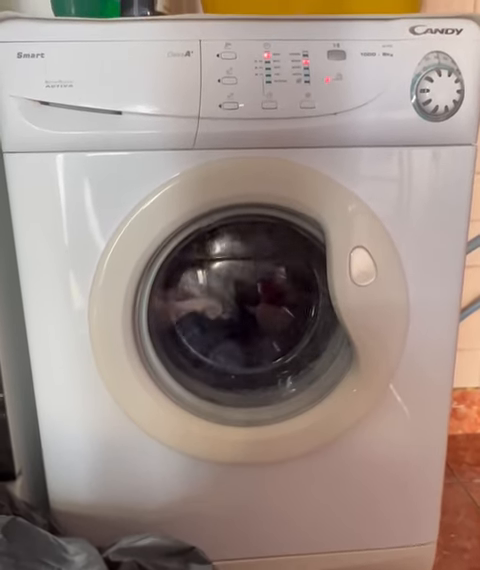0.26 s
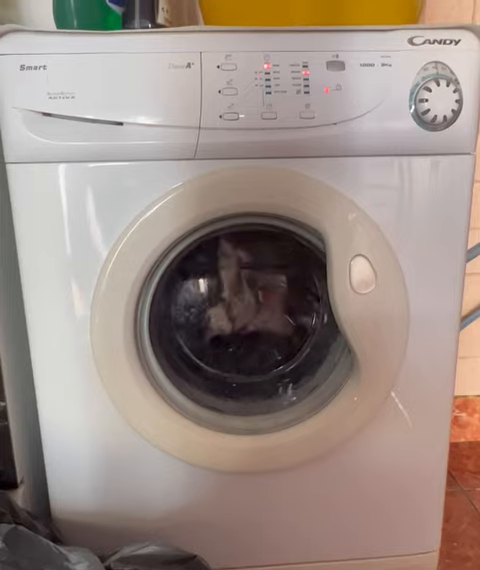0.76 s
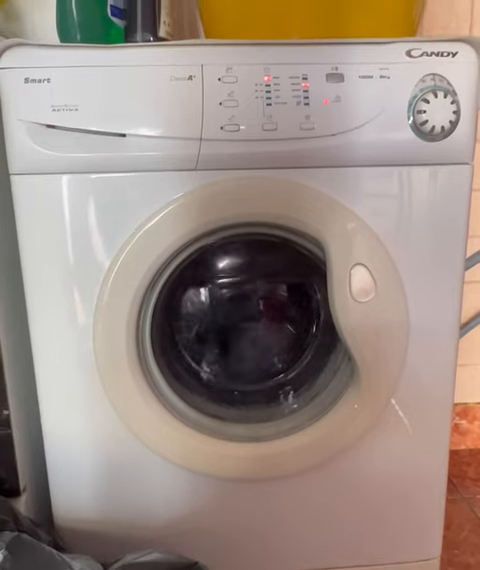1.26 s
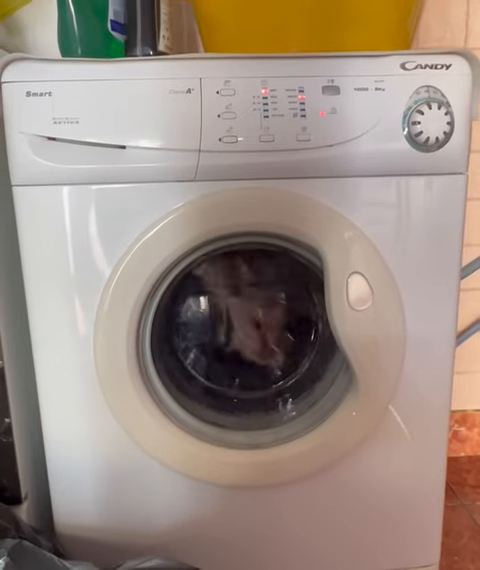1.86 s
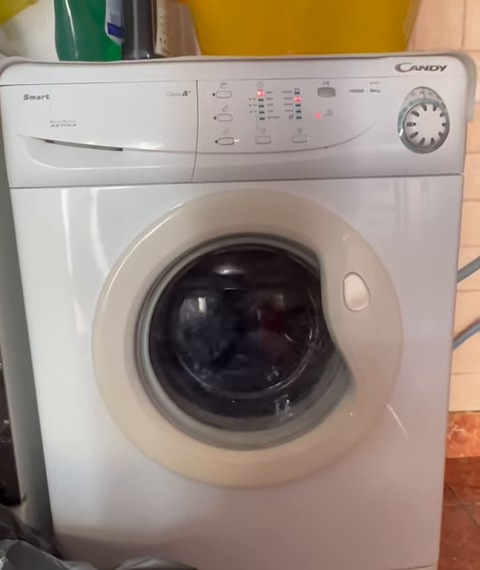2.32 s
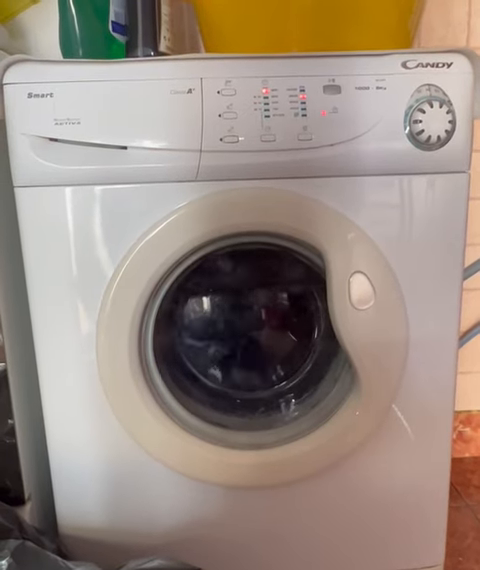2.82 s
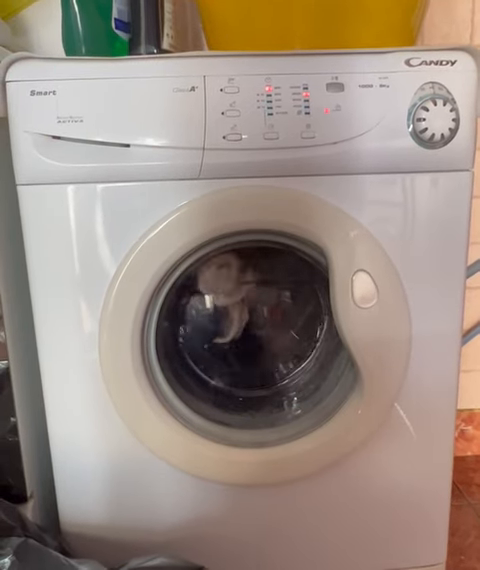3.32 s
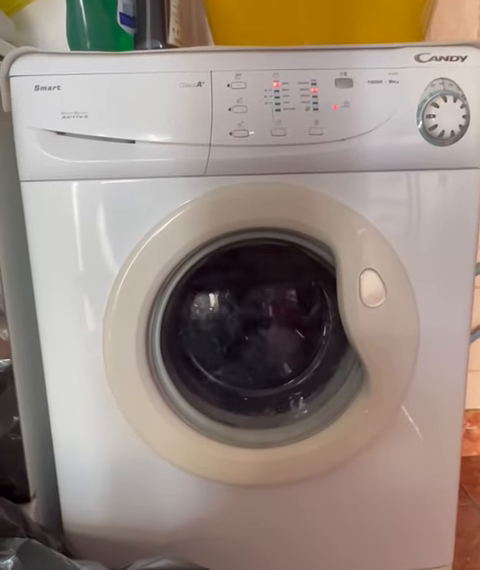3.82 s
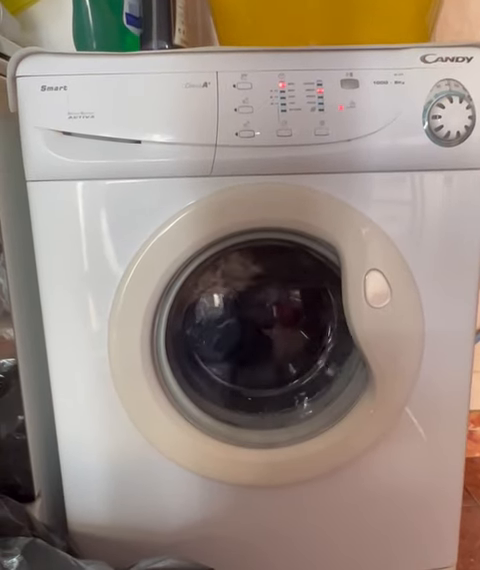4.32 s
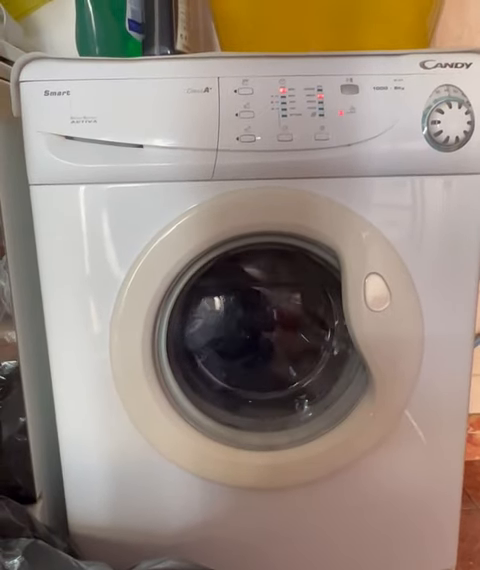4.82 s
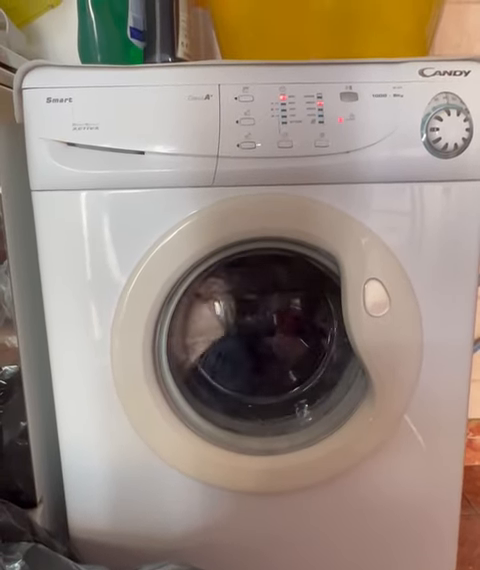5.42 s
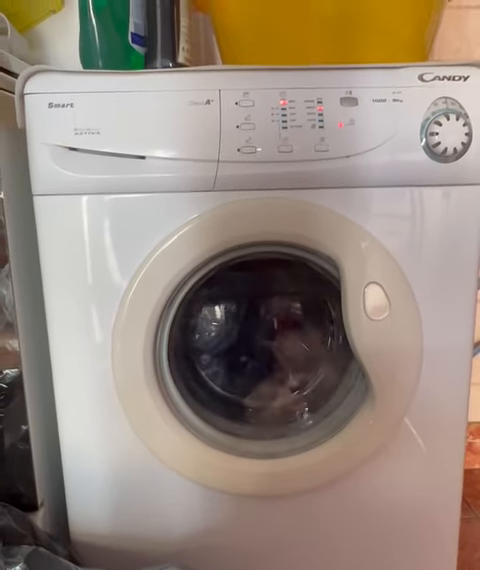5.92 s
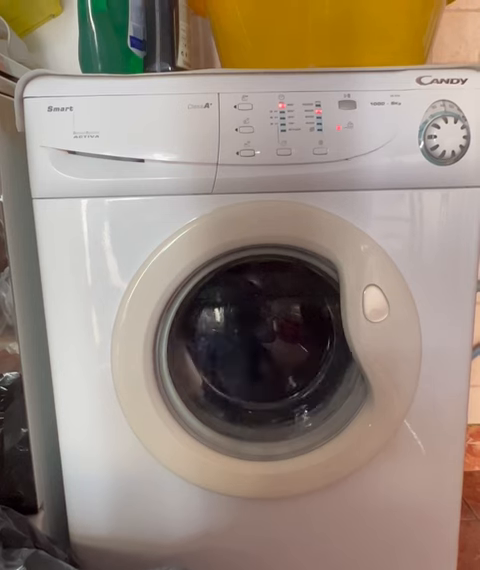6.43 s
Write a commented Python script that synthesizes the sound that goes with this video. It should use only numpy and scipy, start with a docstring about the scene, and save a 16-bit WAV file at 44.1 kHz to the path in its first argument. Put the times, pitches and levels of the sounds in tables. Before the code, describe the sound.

Wet clothes tumble in a washing machine with irregular thuds and splashes over a steady motor hum that stops at the end.

```python
"""A front-loading washing machine tumbles wet laundry, close to a two-port microphone in a tiled room.
From the start the motor hums on multiples of twice the mains frequency and whirs through the cabinet.
Then, again and again, lifted laundry slaps down into the water: the drum thuds, and the water splashes
and sloshes. After about six seconds the motor cuts out, the last laundry lands and the sound fades."""
import sys
import numpy as np
from scipy import signal
from scipy.fft import rfft, irfft
from scipy.io import wavfile
from scipy.ndimage import uniform_filter1d

SR = 44100
rng = np.random.default_rng(int(sys.argv[2]) if len(sys.argv) > 2 else 0)


def file_out(sig):
    """Save sig as 16-bit WAV at sys.argv[1]."""
    # one column per channel
    cols = np.atleast_2d(sig).T
    # limit, then scale
    lim = np.clip(cols, -1, 1)
    pcm = np.round(lim * 32767).astype(np.int16)
    wavfile.write(sys.argv[1], SR, pcm)


N = 294147
T, HZ = np.arange(N) / SR, np.fft.rfftfreq(N, 1 / SR)

# Laundry landing. Thud, spray and air note are set against the splash, which falls 60 dB in fade_s:
# start_s, splash_db, thud_db, spray_db, note_db, note_hz, fade_s
LANDINGS = [(0.2387, -49.5, 5.5, -5, -5.5, 670, 0.25), (0.28, -47, 0, -7, -4, 526, 0.31),
            (0.612, -49, 11.5, -24, 8.5, 675, 0.24), (0.638, -53, 8, -12, 7, 468, 0.26),
            (0.8749, -52.5, 0, -15, 2.2, 337, 0.18), (1.002, -47.5, 5.5, -10.5, -1, 571, 0.39),
            (1.0368, -52.5, 8, -7, 9, 322.7, 0.38), (1.1013, -51, 10, -7, 4, 520, 0.26),
            (1.202, -56, 5, -18, -5, 364, 0.15), (1.5624, -57, 1.5, -12, -5, 336, 0.52),
            (1.708, -55, -6, -5.5, -2, 675, 0.16), (1.8317, -52, 11, -14, 0, 703, 0.26),
            (1.8583, -43, 5, -10.5, 2, 360, 0.24), (2.155, -54, -1, -7, 3, 322, 0.28),
            (2.1977, -42.5, 4.5, -8, -11, 650, 0.36), (2.2573, -44.5, 5.5, -9, 8, 328, 0.17),
            (2.3191, -64, 8, 3.5, 15, 426, 0.2), (2.6815, -59, 4, -10, 10, 678, 0.52),
            (2.9259, -49.5, -2, -6.5, -9, 357, 0.38), (2.969, -52.5, 7.5, -19.5, 0.1, 351, 0.4),
            (3.0293, -51, 5, -14.5, 4, 682, 0.45), (3.0966, -46, 5.5, -26, 2, 592, 0.12),
            (3.5943, -55, 5, -6, 3, 330, 0.25), (3.6302, -42.5, 5, -11, 2.5, 336, 0.32),
            (3.681, -50, 4, -10, -12, 360, 0.3), (4.0174, -38.5, -3, -10, -3.5, 678, 0.2),
            (4.0592, -45, 1, -16, -3.5, 661, 0.27), (4.1008, -46.5, 5, -10, 3, 471, 0.22),
            (4.4227, -53, 1.5, -12, -5, 369, 0.28), (4.4507, -43.5, 6.5, -30, 3, 483, 0.21),
            (4.676, -55, -3, -9.5, -1, 331, 0.35), (4.706, -49, 4.5, -11, -2.5, 397, 0.48),
            (4.742, -44, 4, -12, -5, 424, 0.21), (4.8004, -43.5, 10.5, -23, 9, 333.4, 0.097),
            (5.233, -38, -2, -10.5, -5.5, 662, 0.27), (5.2956, -37, -2.5, -13, -5, 753, 0.16),
            (5.3394, -54, 4, -9, 7, 531, 0.23), (5.4834, -62, 13, -8.5, 3, 328, 0.83),
            (5.614, -47, -11, -23.5, 0, 691, 0.15), (5.8673, -48, -1, -10, -5, 496, 0.41),
            (5.92, -49.5, 5.5, -9, -2, 338, 0.28), (5.9553, -51.5, 6.5, -9, 0, 383, 0.19),
            (6.304, -36, -8, -12, -9, 646, 0.18), (6.3626, -43, 4, -16, -6, 682, 0.24),
            (6.4223, -46.5, 6, -32, 0, 644, 0.17), (6.4442, -46, 6.5, -6.5, 7, 429.6, 0.25)]
# Where the drum's shell rings: pitch_hz, width_hz, level_db
DRUM_RINGS = [(72, 32, -28), (139, 133, 2.5), (270.5, 53, 3.5), (343, 52, -1.5), (477, 47, -4),
              (538, 91, -5.5), (640.5, 17, 1), (950, 270, -11)]
# Tone colour of the splash: pitch_hz, level_db
SPLASH_COLOUR = [(400, -32), (750, 2), (1100, 1), (1700, -3), (2300, -7.5), (3500, -51)]
# Tone colour of the fine spray: pitch_hz, level_db
SPRAY_COLOUR = [(1500, -24), (2300, 5), (3500, -4.5), (5200, -13), (7500, -12.5), (12000, -34)]
# The hum's three lowest tones swell and sag as the load tumbles: time_s, first_db, second_db, third_db
LOW_HUM = [(0.0, -52, -46.5, -55), (0.26, -43, -47, -49.5), (0.33, -43.5, -49.5, -57.5),
           (0.56, -43, -44.5, -49.5), (0.86, -41, -48.5, -47.5), (0.92, -48.5, -52, -56),
           (1.34, -44, -48.5, -49), (1.39, -52, -52.5, -49), (1.57, -41, -49.5, -54),
           (1.78, -47.5, -45.5, -53.5), (1.98, -41, -46.5, -48), (2.08, -42, -54.5, -54),
           (2.19, -53, -55, -48), (2.4, -42, -46, -51.5), (2.51, -49, -51, -51.5),
           (2.74, -41.5, -46, -49.5), (2.81, -45, -55, -46.5), (2.93, -50, -47.5, -49.5),
           (3.02, -39, -46.5, -42.5), (3.2, -44, -51, -50.5), (3.71, -47, -48.5, -49.5),
           (3.8, -46, -53, -56), (3.99, -50.5, -47.5, -43), (4.2, -42, -49, -52.5),
           (4.31, -46.5, -50.5, -53), (4.54, -41.5, -49, -46.5), (4.64, -52, -51, -52),
           (4.71, -42.5, -46.5, -44), (4.94, -45, -52, -52.5), (5.12, -46.5, -49, -46),
           (5.32, -42.5, -46.5, -56.5), (5.88, -48.5, -52, -48), (6.07, -42, -51, -52.5),
           (6.34, -48.5, -47.5, -49)]
# The hum's higher tones: multiple, level_db, waver_db
HIGH_HUM = [(4, -63.5, 2), (6, -67.5, 2), (7, -62, 2), (8, -63, 1), (20, -69.5, 1.5)]
# Tone colour of the motor's whir: pitch_hz, level_db
WHIR_COLOUR = [(20, -51), (45, -68), (85, -2.5), (150, -9.5), (250, -17), (440, -30), (700, -24),
               (1000, -35), (1700, -36), (2500, -38.5), (3400, -42), (5200, -46), (6400, -37.5),
               (8300, -37), (9000, -42), (11600, -45.5), (11900, -53)]
# Whine of the rotor, the motor's turning part: pitch_hz, width_hz, level_db
ROTOR_WHINE = [(4410, 160, -74.5), (4603, 55, -79), (7460, 230, -77.5), (7706, 130, -75.5),
               (10200, 65, -98)]
# Where the cabinet rings: pitch_hz, width_hz, level_db
CABINET_RINGS = [(134.6, 7.4, -65), (495, 36, -70), (576, 100, -62), (832, 96, -71), (1580, 85, -76),
                 (2004, 124, -67.5), (2170, 71, -95)]
# Tone colour of a thin, high hiss: pitch_hz, level_db
HISS_COLOUR = [(9500, -51), (10600, -6), (11500, 4), (12200, 9), (13500, 1), (14500, 3), (15600, -20)]
# How wide the sound spreads between left and right at each pitch, narrow around 6-7 kHz:
# pitch_hz, level_db, likeness, phase_rad
STEREO_WIDTH = [(100, -30.5, 0, -9), (200, -17, 0.27, -2), (300, -17, 1, -3), (407, -15, 0, 0),
                (596, -3.5, 0.5, -2), (720, -10, 0.98, -2), (1000, -7, 0.2, -2), (1660, -17.5, 0.5, -2),
                (1930, -15, 1, -1), (2870, 1.5, 0, -1), (3790, -2.5, 1, -1.5), (4950, -1.5, 0.98, 24.5),
                (5340, 1.5, 0.7, -1), (5900, -29, 0, 0), (6900, -24, 0, -1.5), (7430, -14, 0.8, -1.5),
                (10000, 1.5, 0.5, -1.5), (11600, -2, .5, -1.5)]

LEAD_SAMPLES, TOUCH_S = 300, 0.00524  # a landing's slot opens, and the cloth touches, just before start_s
THUD_RISE_S, SPLASH_RISE_S = 0.0066, 0.00855
THUD_FALL, NOTE_FALL, SMACK_FALL = 0.6, 0.85, 0.98  # fading speeds against that of the splash
SMACK_DB, SMACK_HZ = -10.5, (881, 1100.4)  # level against the splash; pitch range
HARD_DB, SLOWER_S_PER_DB = -46, 0.000228  # landings above HARD_DB splash a little more slowly
SMACK_HZ_PER_DB, SMACK_DB_PER_DB = 58, 0.35  # and smack higher and louder
BUBBLE_HZ, BUBBLES_PER_S = (706.4, 3090), 700
SLOSH_DB, ROCK_FLOOR_DB, ROCK_DB, ROCK_S = -68.5, -69, -15.5, 0.062
HUM_HZ = 100.03  # twice the mains frequency
WHIR_DB, DRONE_DB, HISS_DB = -54, -59, -73.5
# How each part dies away at the end: start_s, db_per_s
HUM_STOP, CABINET_STOP, ROTOR_STOP, WATER_STOP = (6.35, 304.5), (6.42, 144), (6.45, 210), (6.53, 165)
MACHINE_TOP_HZ, MICROPHONE_TOP_HZ = 12240, 15700


def laundry():
    """Landings and steady sloshing ring the drum and stir up a bubbling splash and a fine spray."""
    thud, splash, spray, notes = landings()
    slosh_db = SLOSH_DB + flicker(1.6) + dying(*WATER_STOP)
    shell = noise(sum(gain_of(db) * peak(hz, width) for hz, width, db in DRUM_RINGS))
    water = 0.76 * noise(colour(SPLASH_COLOUR)) + 0.55 * bubbles()
    mist = noise(colour(SPRAY_COLOUR))
    return (np.sqrt(thud + gain_of(slosh_db + 9.5) ** 2) * gain_of(2.56 * flicker(26)) * shell
            + np.sqrt(splash + gain_of(slosh_db) ** 2) * gain_of(0.83 * flicker(35)) * water
            + np.sqrt(spray + gain_of(slosh_db - 5) ** 2) * gain_of(1.2 * flicker(130)) * mist
            + notes + rocking(thud))


def landings():
    """Wet cloth hits water: the power of thud, splash and spray, and the sound of air and smacks."""
    thud, splash, spray = np.zeros((3, N))
    notes = np.zeros((2, N))
    for start_s, db, thud_db, spray_db, note_db, note_hz, fade_s in LANDINGS:
        age = np.clip(T[round(start_s * SR) - LEAD_SAMPLES:][:SR // 2] - start_s + TOUCH_S, 0, None)
        fall_db = -60 * age / fade_s
        hard_db = max(db - HARD_DB, 0)
        thud_rise = 1 - np.exp(-age / THUD_RISE_S)
        splash_rise = 1 - np.exp(-age / (SPLASH_RISE_S + SLOWER_S_PER_DB * hard_db))
        add(thud, start_s, (gain_of(db + thud_db + THUD_FALL * fall_db) * thud_rise) ** 2)
        add(splash, start_s, (gain_of(db + fall_db) * splash_rise) ** 2)
        add(spray, start_s, (gain_of(db + spray_db + fall_db) * splash_rise) ** 2)
        trapped_air = thud_rise * wet_note(note_hz, age, width_hz=90)
        add(notes, start_s, gain_of(db + note_db + NOTE_FALL * fall_db) * trapped_air)
        smack_hz = rng.uniform(*SMACK_HZ) + SMACK_HZ_PER_DB * hard_db
        smack_db = db + SMACK_DB + SMACK_DB_PER_DB * hard_db + SMACK_FALL * fall_db
        add(notes, start_s, gain_of(smack_db) * splash_rise * wet_note(smack_hz, age, width_hz=450))
    return thud, splash, spray, notes


def wet_note(hz, age, width_hz):
    """A wet, unsteady note: a narrow band of noise, made twice over."""
    wobble = uniform_filter1d(rng.standard_normal((2, 2, len(age))), round(SR / width_hz), axis=2)
    phase = 2 * np.pi * hz * age
    return evened(wobble[0] * np.cos(phase) + wobble[1] * np.sin(phase))


def bubbles(sizes=16):
    """Bubbles of many sizes ping at random moments, each briefly rising in pitch."""
    out = np.zeros((2, N))
    for hz in np.geomspace(*BUBBLE_HZ, sizes):
        cycles = np.arange(0, 30, hz / SR)
        loudness = np.exp(-cycles / 7) * (1 - np.exp(-cycles / 1.2))
        ping = loudness * np.sin(2 * np.pi * cycles * (1 + 0.0035 * cycles))
        starts = rng.standard_normal((2, N)) * (rng.random((2, N)) < BUBBLES_PER_S / sizes / SR)
        out += signal.oaconvolve(starts, ping[None], axes=1)[:, :N]
    return evened(irfft(rfft(out) * colour(SPLASH_COLOUR), N))


def rocking(thud):
    """The cabinet rocks on its feet after each thud, with a deep rumble."""
    keep = np.exp(-1 / (ROCK_S * SR))
    lingering = signal.lfilter([1 - keep], [1, -keep], thud)
    power = gain_of(ROCK_FLOOR_DB + dying(*WATER_STOP)) ** 2 + gain_of(ROCK_DB) ** 2 * lingering
    return np.sqrt(power) * noise(peak(hz=56, width_hz=23))


def motor_hum():
    """The motor's magnetic tug makes wavering tones, in step with each other, until the power is cut."""
    phase = 2 * np.pi * HUM_HZ * T
    times_s, *levels_db = np.transpose(LOW_HUM)
    low = sum(gain_of(np.interp(T, times_s, db) + 1.62 * flicker(7))
              * np.cos(multiple * phase + 0.25 * flicker(6)) for multiple, db in enumerate(levels_db, 1))
    high = sum(gain_of(db + waver_db * flicker(9)) * np.cos(multiple * phase + 0.5 * flicker(9))
               for multiple, db, waver_db in HIGH_HUM)
    return -np.sqrt(2) * (low + high) * gain_of(dying(*HUM_STOP))


def motor_whir():
    """The turning rotor whirs and whines, and fades as it runs down."""
    whir = gain_of(WHIR_DB + flicker(23)) * noise(colour(WHIR_COLOUR))
    return (whir + ringing(ROTOR_WHINE)) * coasting()


def cabinet():
    """The motor's coils make the cabinet ring and drone until just after the power is cut."""
    drone = gain_of(DRONE_DB + 1.5 * flicker(6.6)) * noise(peak(hz=671.6, width_hz=49))
    return (ringing(CABINET_RINGS) + drone) * gain_of(dying(*CABINET_STOP))


def hiss():
    """A thin, high hiss that fades with the rotor."""
    return gain_of(HISS_DB + 1.2 * flicker(21)) * coasting() * noise(colour(HISS_COLOUR))[0]


def ringing(rings):
    """Noise ringing at each listed pitch, each wavering a little."""
    return sum(gain_of(db + 1.23 * flicker(7.2)) * noise(peak(hz, width)) for hz, width, db in rings)


def coasting(floor_db=-13):
    """Gain that sinks to a faint rest as the rotor runs down."""
    return gain_of(np.maximum(dying(*ROTOR_STOP), floor_db))


def dying(start_s, db_per_s):
    """Level in dB that holds until start_s and then falls."""
    return -db_per_s * np.clip(T - start_s, 0, None)


def noise(gain):
    """Two unrelated noises of one tone colour."""
    return evened(irfft(rfft(rng.standard_normal((2, N))) * gain, N))


def flicker(hz):
    """A random wobble of size 1, mostly slower than hz."""
    return evened(irfft(rfft(rng.standard_normal(N)) / (1 + (HZ / hz) ** 4), N))


def peak(hz, width_hz):
    """Gain that favours the pitches near hz."""
    return 1 / (1 + (2 * (HZ - hz) / width_hz) ** 2)


def curves(table):
    """Spreads each column after pitch_hz over all pitches."""
    pitch_hz, *columns = np.transpose(table)
    return [np.interp(np.log(HZ + 1), np.log(pitch_hz + 1), column) for column in columns]


def colour(table):
    """A tone colour table as a gain at every pitch."""
    return gain_of(curves(table)[0])


def gain_of(db):
    """Turns decibels into a number to multiply by."""
    return 10 ** (np.asarray(db) / 20)


def evened(x):
    """Scales a signal to a typical size (rms) of 1."""
    return x / np.sqrt(np.mean(x ** 2) + 1e-20)


def add(mix, start_s, part):
    """Mixes a part in, LEAD_SAMPLES ahead of start_s."""
    mix[..., round(start_s * SR) - LEAD_SAMPLES:][..., :part.shape[-1]] += part


def scene():
    """Left and right differ by a phase-shifted share of their sum and an unrelated share from the tiles."""
    middle, tiles = motor_whir() + cabinet() + laundry()
    middle = middle + motor_hum()
    level_db, likeness, phase_rad = curves(STEREO_WIDTH)
    likeness = np.clip(likeness, 0, 1)
    side = likeness * np.exp(1j * phase_rad) * rfft(middle) + np.sqrt(1 - likeness ** 2) * rfft(tiles)
    side = irfft(side * gain_of(level_db), N)
    treble_cut = signal.firwin(511, MACHINE_TOP_HZ, window=("kaiser", 9), fs=SR)
    machine = signal.oaconvolve([middle + side, middle - side], treble_cut[None], "same")
    return machine + hiss() * [[1], [-1]]  # opposite sign in each ear


def record(dry):
    """The microphone drops the deepest bass and the highest treble."""
    dry = signal.sosfilt(signal.butter(3, 42, "high", fs=SR, output="sos"), dry)
    treble_cut = signal.firwin(511, MICROPHONE_TOP_HZ, window=("kaiser", 9), fs=SR)
    return signal.oaconvolve(dry, treble_cut[None], "same")


dry = scene()
out = record(dry)
file_out(out)
```